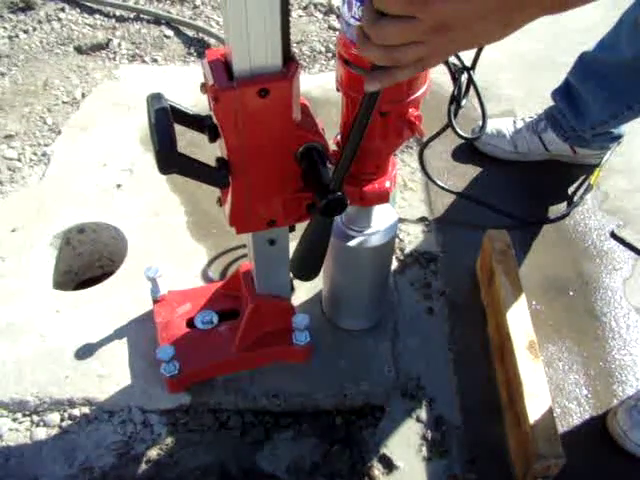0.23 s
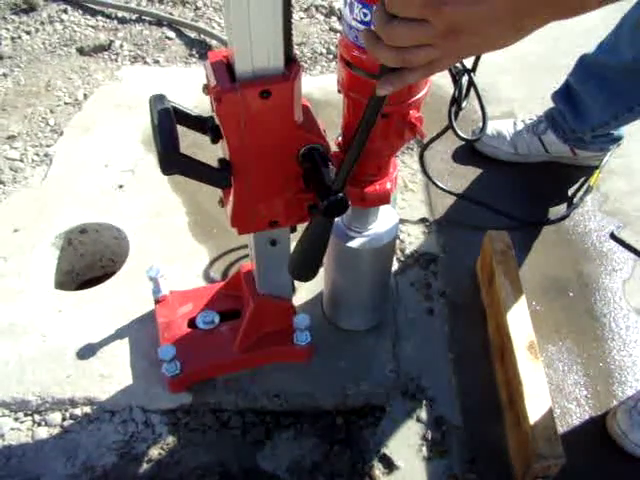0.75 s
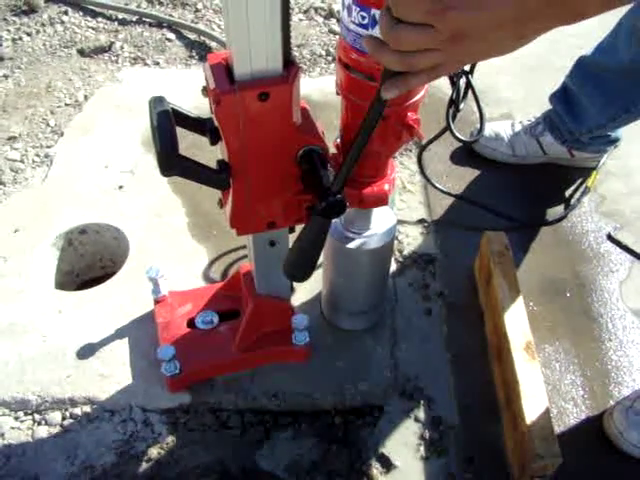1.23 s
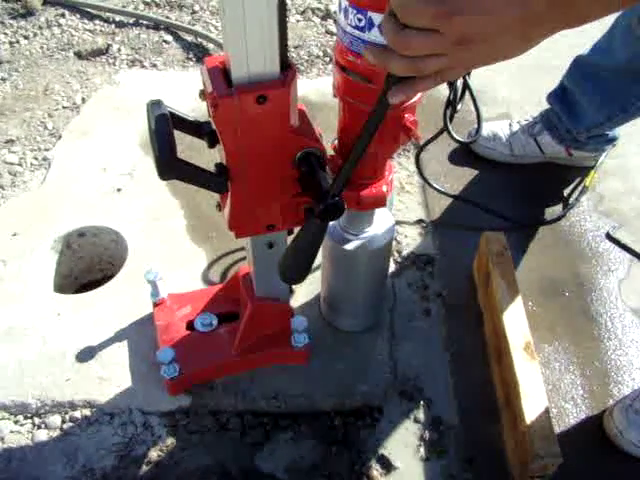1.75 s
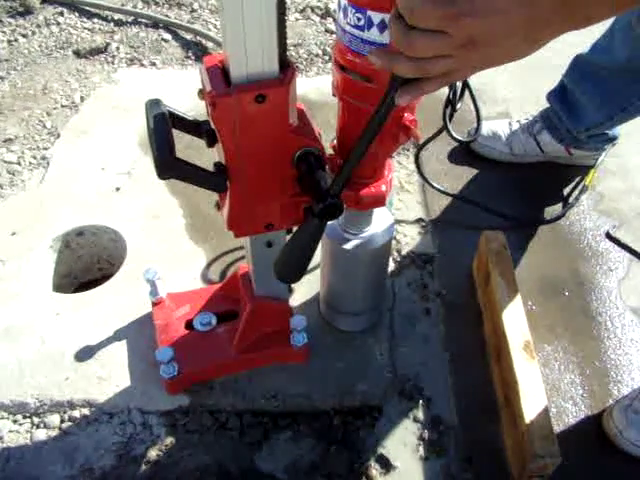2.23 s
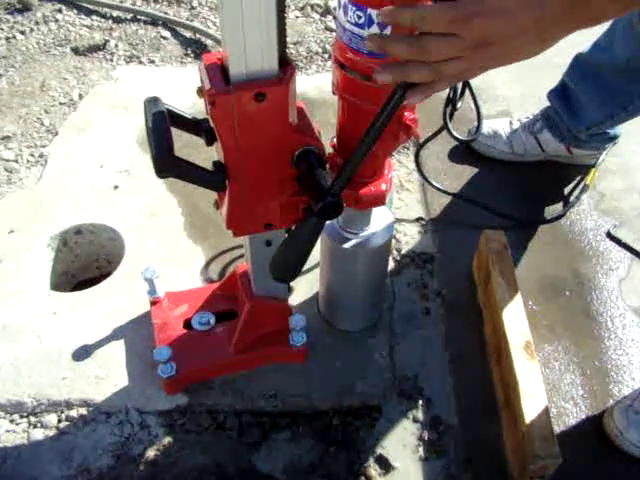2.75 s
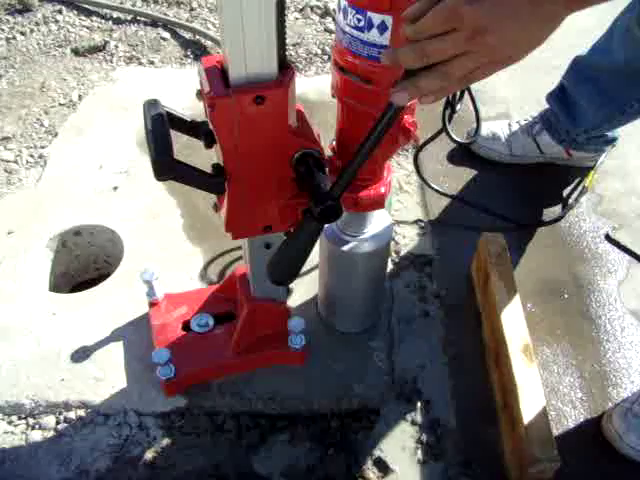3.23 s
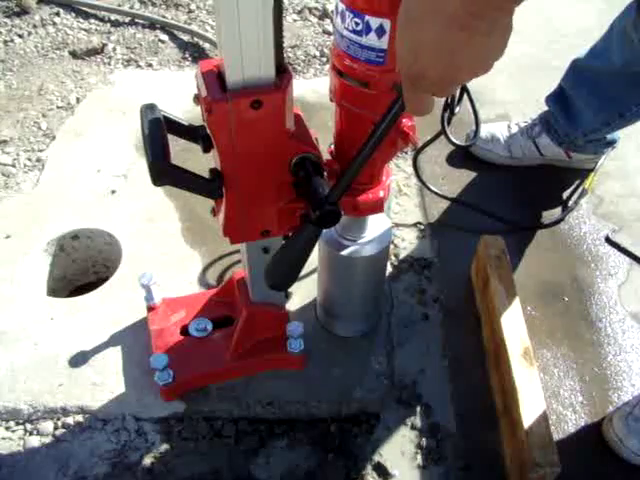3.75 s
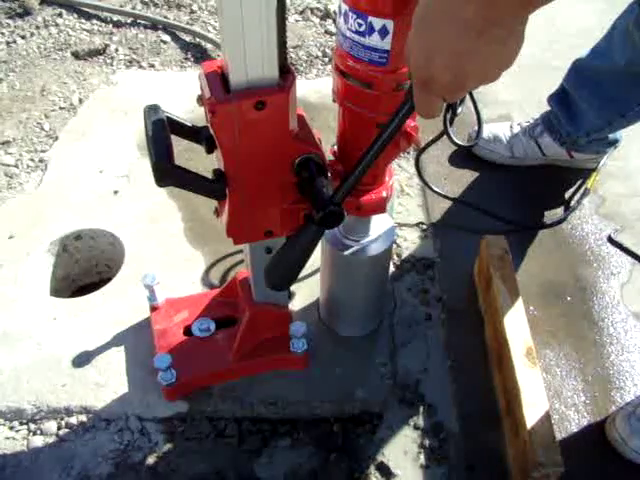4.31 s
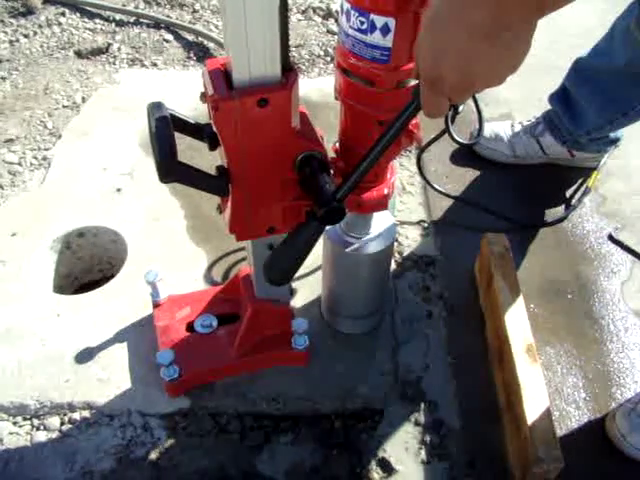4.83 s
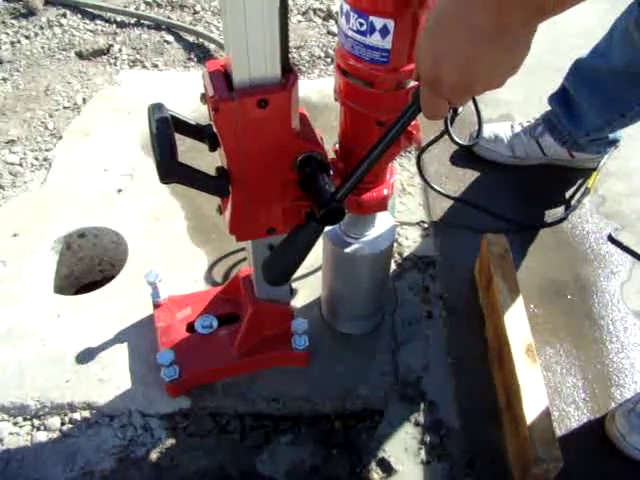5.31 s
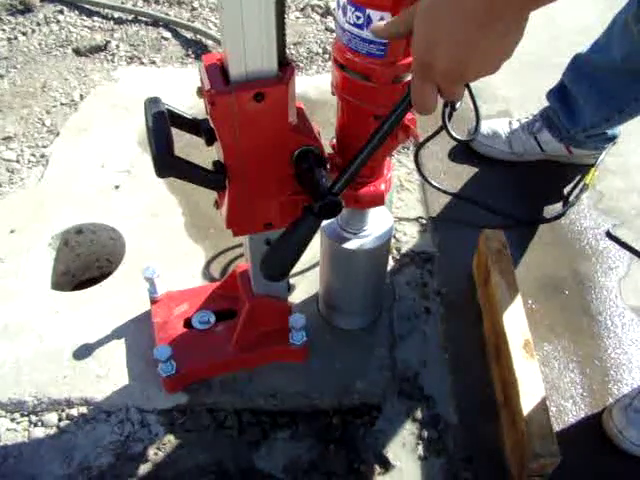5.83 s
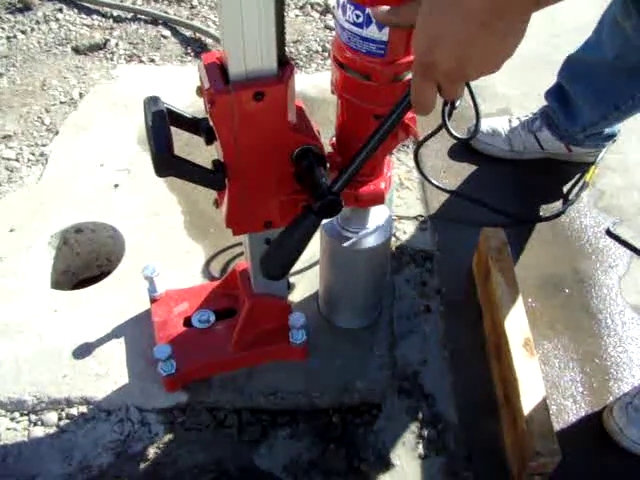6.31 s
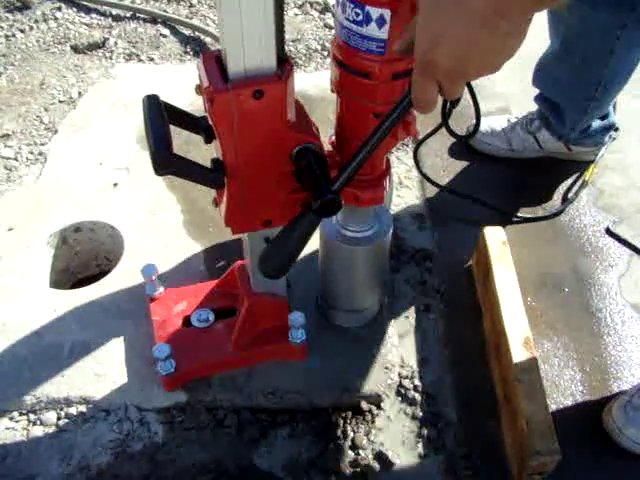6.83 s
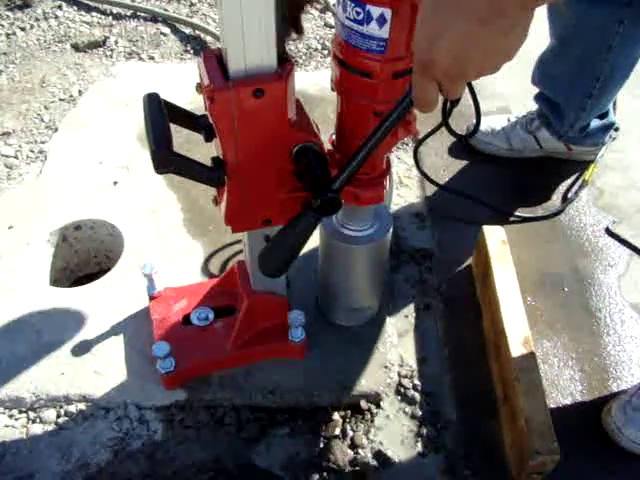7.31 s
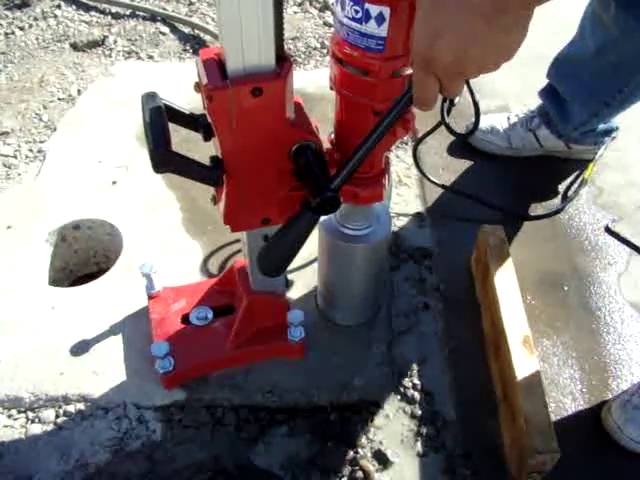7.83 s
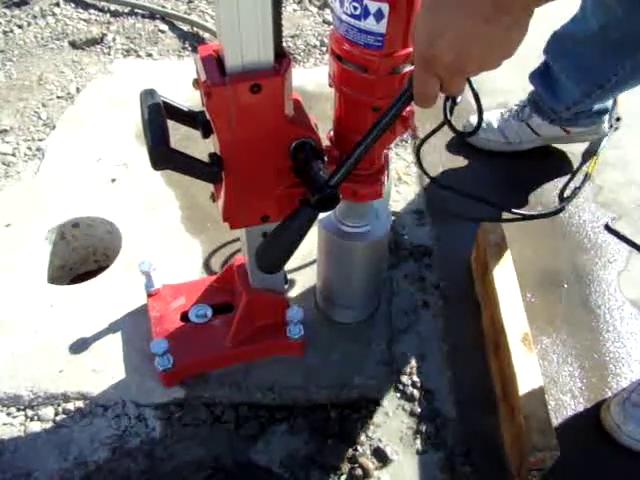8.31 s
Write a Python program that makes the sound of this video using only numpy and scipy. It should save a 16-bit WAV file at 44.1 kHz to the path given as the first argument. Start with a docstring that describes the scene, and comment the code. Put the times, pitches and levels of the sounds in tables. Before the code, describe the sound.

Close by and outdoors, a stand-mounted electric drill runs without a break, boring into wet concrete. A high, slightly throbbing motor whine sits on top of gritty grinding, fan noise and a low buzz from the stand. The motor labours at first, then speeds up in two steps, the whine swelling and shifting. In the last third it runs lighter and faster, with rapid gear rattle and a surging howl.

```python
"""An electric core drill on a stand grinds into wet concrete, outdoors, about a metre away.
Its motor pinion whines through a two-stage gearbox, swelling as it sweeps the modes of the gear case.
Underneath are the rush of the cooling fan and the grinding bit, and a low buzz from the stand.
As the feed eases the motor speeds up, the slack gears chatter and a bearing starts to howl."""
import sys
import numpy as np
from scipy import signal
from scipy.fft import rfft, irfft
from scipy.io import wavfile
from scipy.ndimage import uniform_filter1d, map_coordinates

SR = 44100
rng = np.random.default_rng(int(sys.argv[2]) if len(sys.argv) > 2 else 0)


def dump_mix(stems):
    """Bounce the given channels to the path in sys.argv[1] as a 16-bit WAV at rate SR."""
    frames = np.atleast_2d(stems).T  # one column per channel
    limited = np.clip(frames, -1, 1)  # hard clip at full scale
    pcm = np.round(limited * 32767).astype(np.int16)
    wavfile.write(sys.argv[1], SR, pcm)


N = 377496
TIME = np.arange(N) / SR
BIN_HZ = np.maximum(np.arange(N // 2 + 1) * SR / N, 1)
PINION_TEETH, WHEEL_TEETH, SECOND_PINION_TEETH, SPINDLE_TEETH = 7, 34, 8, 38


def undb(db):
    """Decibels to gain."""
    return 10 ** (np.asarray(db) / 20)


def curve(points):
    """Automation curve: straight lines through (seconds, value) points."""
    return np.interp(TIME, *np.transpose(points))


def unit(x):
    """Scale to rms 1."""
    return x / np.sqrt(np.mean(x ** 2))


def shaped(x, gain):
    """Filter by a gain for each frequency."""
    return irfft(rfft(x) * gain, N)


def noise(gain):
    """Noise of rms 1 with the given colour."""
    return unit(shaped(rng.standard_normal(N), gain))


def wander(hz):
    """Random drift of rms 1, moving at up to about the given rate."""
    return noise(1 / (1 + (BIN_HZ / hz) ** 2))


def resonance(hz, width_hz):
    """Response of one mode, gain 1 at its centre."""
    return 1 / (1 + 1j * (BIN_HZ / hz - hz / BIN_HZ) * hz / width_hz)


def tone(turns):
    """Sine of rms 1, from a phase in turns."""
    return np.sqrt(2) * np.cos(2 * np.pi * turns)


def smeared(turns, spread, hz):
    """A tone with a skirt of noise: its level and phase shake at up to about the given rate."""
    in_phase = (1 + spread * wander(hz)) * tone(turns)
    quadrature = spread * wander(hz) * tone(turns + 1 / 4)
    return (in_phase + quadrature) / np.sqrt(1 + spread ** 2)


def looped(pattern, turns):
    """A pattern that comes round with every turn of a part, at rms 1."""
    return unit(map_coordinates(pattern, [turns % 1 * len(pattern)], order=3, mode="grid-wrap"))


def by_feed(shaft_hz, values):
    """Crossfade three values, for heavy, medium and light feed, by the motor's speed."""
    # Shaft speeds in Hz under heavy, medium and light feed.
    feed_hz = [290, 320, 358]
    return np.interp(shaft_hz, feed_hz, values)


def harmonics(table, turns, shaft_hz, flutter):
    """Partials of one rotating part: each follows the feed and flutters on its own."""
    shake = wander(35)
    out = 0
    for multiple, *levels_db in table:
        gain = by_feed(shaft_hz, undb(levels_db)) * (1 + flutter * np.roll(shake, rng.integers(N)))
        out = out + gain * tone(round(multiple) * turns + rng.random())
    return out


def stand_buzz(spindle, eased, level_db=-51, eased_db=-2.5, points=128):
    """The bit's segments pass the same bumps on every turn and shake the stand with a low buzz."""
    # Bumps under the bit. Each row: bumps per turn, relative level in dB.
    bumps = [(5, -30), (9, -11), (13, -5.5), (15, -8), (19, 6), (21, -7.5), (23, -8), (29, -8.5), (30, 6),
             (31, -13), (40, -29.5)]
    per_turn, bump_db = np.transpose(bumps)
    multiples = np.arange(points // 2 + 1)
    sizes = undb(np.interp(multiples, np.round(per_turn), bump_db, left=-80, right=-80))
    one_turn = irfft(sizes * np.exp(2j * np.pi * rng.random(len(sizes))), points)
    return undb(level_db + eased_db * eased) * looped(one_turn, spindle)


def housing_colour(points):
    """A smooth spectrum lifted by the resonances of housing and stand."""
    # The resonances. Each row: centre in Hz, width in Hz, lift in dB.
    modes = [(668, 33, 3.5), (978, 360, 12.5), (1364, 134, 7), (1942, 277, 8.5), (2562, 260, 5.5)]
    hz, db = np.transpose(points)
    lift_db = sum(peak_db * abs(resonance(centre, width)) ** 2 for centre, width, peak_db in modes)
    return undb(np.interp(np.log(BIN_HZ), np.log(hz), db) + lift_db)


def rush(wheel, shaft_hz, eased, knock, roughness=0.27, sway=0.043, flicker_db=0.74, grit_db=0.81):
    """Fan air, grinding grit and tooth roughness, all coloured by the housing."""
    # Colour under heavy and under light feed. Each row: frequency in Hz, relative level in dB.
    heavy_colour = [(30, -33), (105, -37.5), (310, -33.5), (450, -20), (600, -12), (770, -17),
                    (1600, -14.5), (2800, -3.5), (3040, 0.5), (3250, -2.5), (5000, -5), (7300, -7.5),
                    (7950, -8.5), (8700, -11), (9900, -12.5)]
    light_colour = [(30, -30), (110, -43), (190, -21), (310, -27), (450, -17), (600, -7), (780, -12.5),
                    (1650, -6), (2250, -6), (2800, -1), (4200, -1), (5400, -5.5), (5900, -8.5),
                    (7000, -7.5), (8500, -10.5), (9900, -12.5)]
    # Low, middle and hiss bands, where the level is ridden. Each row: lower edge, upper edge in Hz.
    bands = [(900, 1700), (2800, 4000), (7200, 10000)]
    # Base level of those bands. Each row: dB under heavy, medium and light feed.
    band_levels = [(-27.5, -26.5, -26.5), (-24, -23.5, -21.9), (-29, -29, -28)]
    # Swell as the bit grinds more or less. Each row: time in seconds, lift in dB.
    grind_swell = [(0, 0), (2.0, 0), (3.1, -0.8), (3.33, -2), (3.57, 1), (4.3, 0.3), (5.1, 0.45),
                   (5.5, 1.2), (6.8, -0.5), (7.6, 0.6), (8.2, -1.4), (8.56, .4)]
    air = rng.standard_normal(N)
    teeth = roughness * (1 - 0.14 * eased) * looped(rng.standard_normal(512), wheel)
    pulse = 1 + sway * (1 - 0.42 * eased) * tone(wheel) + knock
    source = (air + teeth) * pulse * undb(flicker_db * wander(52))
    heavy = unit(shaped(source, housing_colour(heavy_colour)))
    light = unit(shaped(source, housing_colour(light_colour)))
    blend = (1 - eased) * heavy + eased * light
    log_centres = np.log(bands).mean(axis=1)
    out = 0
    for (low, high), share, levels_db in zip(bands, np.eye(len(bands)), band_levels):
        power = uniform_filter1d(shaped(blend, (BIN_HZ > low) & (BIN_HZ < high)) ** 2, size=SR // 2)
        db = by_feed(shaft_hz, levels_db) + curve(grind_swell) + grit_db * wander(30)
        crossover = np.interp(np.log(BIN_HZ), log_centres, share)
        out = out + shaped(blend, crossover) * undb(db) / np.sqrt(power)
    return out


def motor_hum(shaft, shaft_hz):
    """Fan, slots and commutator sing at multiples of the shaft speed."""
    # Each row: multiple of the shaft speed, level in dB under heavy, medium and light feed.
    partials = [(1, -66, -63.5, -56.5), (2, -44.5, -42, -44), (8, -48, -34, -42), (12, -32.5, -47, -56.5),
                (15, -38.5, -43, -37.5), (24, -44, -41, -49), (29, -51, -49, -64)]
    return harmonics(partials, shaft, shaft_hz, flutter=0.17)


def bearing_howl(shaft, shaft_hz, base_db=-42.5, onset_hz=336, db_per_hz=0.5634, swell_db=5.0):
    """The balls pass a little over twice a turn and slip, so the howl swells; it grows with speed."""
    # Loud surges of the howl. Each row: peak time in seconds, lift in dB.
    surges = [(6.66, 5), (7.73, 6), (7.87, 3), (8.18, 5)]
    passes_per_turn, slip_turns, surge_s = 2.285, 0.12, 0.023
    surge_db = sum(db * np.exp(-.5 * ((TIME - at) / surge_s) ** 2) for at, db in surges)
    speed_db = db_per_hz * np.maximum(shaft_hz - onset_hz, 0)
    level_db = base_db + speed_db + surge_db + swell_db * np.tanh(wander(11))
    ball_turns = passes_per_turn * shaft + slip_turns * wander(13)
    return undb(level_db) * smeared(ball_turns, spread=0.41, hz=53.6)


def slow_gear_whirr(wheel, shaft_hz):
    """The second gear pair, which drives the spindle, whirrs at overtones of its tooth rate."""
    # Each row: multiple of the tooth rate, level in dB under heavy, medium and light feed.
    partials = [(5, -46, -34, -52), (7, -41, -43, -66), (9, -37.5, -37.5, -50), (10, -50, -35, -64),
                (11, -50, -47, -62), (12, -40.5, -60, -57)]
    return harmonics(partials, wheel * SECOND_PINION_TEETH, shaft_hz, flutter=0.49)


def wheel_buzz(wheel, shaft_hz):
    """The first wheel's uneven teeth come round on every turn and buzz; the partial at 136 times the wheel's
    rate is the fourth harmonic of the pinion's tooth tone."""
    # Each row: multiple of the wheel's turning rate, level in dB under heavy, medium and light feed.
    partials = [(8, -53, -50, -71), (11, -48, -48, -65), (26, -52, -44, -57), (36, -49, -38, -48),
                (38, -60, -41, -55), (42, -41, -43, -42), (51, -37.5, -52, -53), (67, -43, -39, -48),
                (69, -37.5, -50, -61), (76, -42, -43, -55), (94, -47, -46, -59), (110, -45, -51, -60),
                (133, -47, -54, -61), (135, -42.5, -45, -58), (136, -43, -44, -49)]
    return harmonics(partials, wheel, shaft_hz, flutter=0.34)


def tooth_knocks(shaft_hz, flight_s=.0185, flight_spread=.18, scatter_db=1.8, width_s=0.0022):
    """Envelope of the slack teeth striking: they bounce unevenly, and a longer flight lands harder."""
    # Shaft speeds in Hz: bouncing starts, is partly loose from and until, is fully loose.
    rattle_hz = [326, 332, 350, 356]
    # The hardest knocks. Each row: time in seconds, envelope height in dB.
    hard_knocks = [(6.732, -7.5), (6.8, -6.5), (6.824, -6.5), (7.898, -9.5), (8.061, -8), (8.111, -8),
                   (8.138, -8.5), (8.204, -8), (8.338, -8), (8.516, -8)]
    bounce_db, partly_loose = -13, undb(-4.0)
    gap_draw, size_draw = rng.standard_normal((600, 2)).T
    stretch = np.exp(flight_spread * gap_draw)
    times = np.cumsum(flight_s * stretch)
    looseness = np.interp(np.interp(times, TIME, shaft_hz), rattle_hz, [0, partly_loose, partly_loose, 1])
    sizes = looseness * stretch ** 0.65 * undb(bounce_db + scatter_db * size_draw)
    hard = [(at, undb(db)) for at, db in hard_knocks]
    # A hard knock takes the place of any bounce within 13 ms.
    bounces = [(s, size) for s, size in zip(times, sizes) if all(abs(s - at) > .013 for at, _ in hard)]
    envelope = np.zeros(N)
    for at, size in hard + bounces:
        near = slice(*np.searchsorted(TIME, [at - .02, at + .02]))
        envelope[near] += size * np.exp(-.5 * ((TIME[near] - at) / width_s) ** 2)
    return envelope


def case_gain(hz, floor_db=-47):
    """How strongly the gear case radiates a tooth tone of this pitch."""
    # Modes of the gear case. Each row: centre in Hz, width in Hz, peak gain in dB.
    modes = [(2008.3, 82, -14.5), (2142, 110, -19), (2222, 60, -23.5), (2380, 92, -23.5), (2516, 120, -21),
             (4264, 280, -23.5), (4680, 410, -26.5), (4920, 122, -24.5), (6200, 170, -34),
             (6420, 190, -25.5), (6643, 270, -24.5), (6920, 240, -25)]
    power = sum((undb(db) / (1 + (2 * (hz - centre) / width) ** 2)) ** 2 for centre, width, db in modes)
    return np.sqrt(power + undb(floor_db) ** 2)


def tooth_harmonic(mesh, wheel, shaft_hz, order, below, above):
    """Gain and phase of one mesh harmonic; under load the off-centre wheel adds a sideband each side."""
    wheel_hz = shaft_hz * PINION_TEETH / WHEEL_TEETH
    load = by_feed(shaft_hz, [1, .25, .3])
    phasor = 0
    for offset, share in [(-1, below * np.sqrt(load)), (0, 0.96), (0.94, above * load)]:
        hz = (order * WHEEL_TEETH + offset) * wheel_hz
        phasor = phasor + share * case_gain(hz) * np.exp(2j * np.pi * offset * wheel)
    return abs(phasor), order * mesh + np.angle(phasor) / (2 * np.pi)


def pinion_whine(wheel, spindle, shaft_hz, knock, roughness=0.22, slack_db=-7.5, knock_swell=2.6):
    """The pinion's tooth tone throbs with the off-centre wheels and chatters when the load is gone."""
    mesh = wheel * WHEEL_TEETH + 0.035 * wander(45)  # the shafts twist a little as the bit grabs
    throb = 1 + .12 * tone(spindle + .4) + 0.035 * tone(2 * spindle)  # the bit binds once a turn
    slack_dip = undb(by_feed(shaft_hz, [0, 0, slack_db]))
    gain, turns = tooth_harmonic(mesh, wheel, shaft_hz, order=1, below=0.27, above=0.16)
    first = gain * slack_dip * throb * (1 + roughness * wander(140)) * tone(turns)
    gain, turns = tooth_harmonic(mesh, wheel, shaft_hz, order=2, below=0.37, above=0.19)
    second = gain * (1 + knock_swell * knock) * smeared(turns, spread=0.38, hz=90)
    gain, turns = tooth_harmonic(mesh, wheel, shaft_hz, order=3, below=.25, above=0.11)
    third = gain * undb(-1.7) * smeared(turns, spread=0.38, hz=90.5)
    # The gear case rings along with the third harmonic.
    case_ring = gain * undb(-7.5) * noise(resonance(hz=6870, width_hz=790) ** 2)
    chatter = undb(-3.0) * knock * tone(mesh + 0.031 * wander(50))
    return first + second + third + case_ring + chatter


def scene():
    """One motor shaft turns the wheel and, through it, the spindle; its speed steers every layer."""
    # Motor speed, rising whenever the feed eases. Each row: time in seconds, shaft speed in Hz.
    motor_speed = [(0.0, 287.6), (1.06, 287.9), (1.27, 288.9), (2.2, 288.2), (2.77, 294.4), (3.09, 289.6),
                   (3.23, 293.7), (3.76, 329.1), (3.9, 334.0), (4.14, 317.2), (4.55, 319.5), (5.05, 315.0),
                   (5.36, 321.2), (5.89, 344.6), (6.26, 353.7), (6.76, 359.9), (8.07, 365.3), (8.56, 354.3)]
    shaft_hz = curve(motor_speed)
    shaft = np.cumsum(shaft_hz) / SR  # angles count in turns
    wheel = shaft * PINION_TEETH / WHEEL_TEETH
    spindle = wheel * SECOND_PINION_TEETH / SPINDLE_TEETH
    eased = by_feed(shaft_hz, [0, .7, 1])
    knock = tooth_knocks(shaft_hz)
    whine = pinion_whine(wheel, spindle, shaft_hz, knock)
    drive = wheel_buzz(wheel, shaft_hz) + slow_gear_whirr(wheel, shaft_hz) + motor_hum(shaft, shaft_hz)
    bed = rush(wheel, shaft_hz, eased, knock) + stand_buzz(spindle, eased)
    howl = bearing_howl(shaft, shaft_hz)
    return (bed + howl + drive + whine)[None]


def record(dry, ceiling=.85, low_cut_hz=130, top_hz=10020):
    """Round off the very highest peaks, thin the bass and cut the top steeply."""
    rounded = dry / (1 + (dry / ceiling) ** 8) ** (1 / 8)
    thinned = signal.sosfilt(signal.butter(1, low_cut_hz, "high", fs=SR, output="sos"), rounded)
    return signal.sosfilt(signal.ellip(12, .1, 80, top_hz, fs=SR, output="sos"), thinned)


dry = scene()
out = record(dry)
dump_mix(out)
```